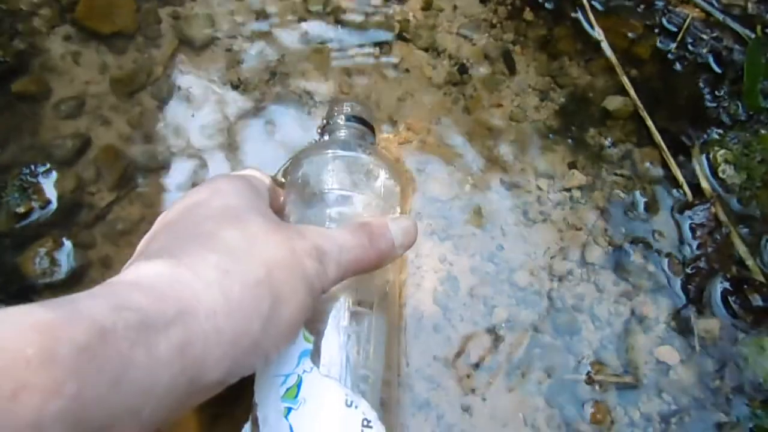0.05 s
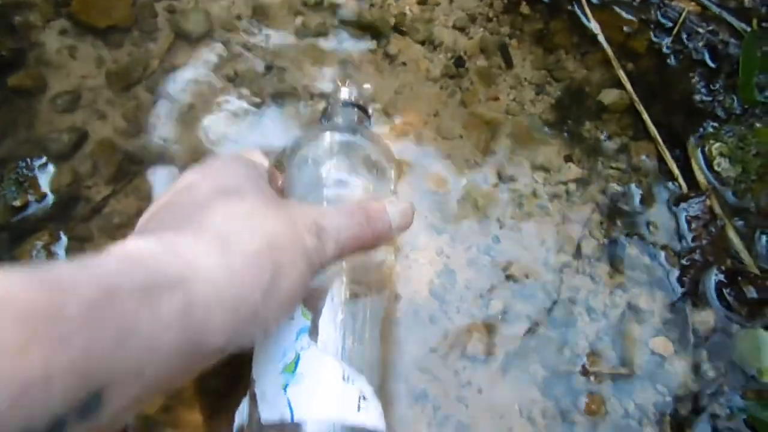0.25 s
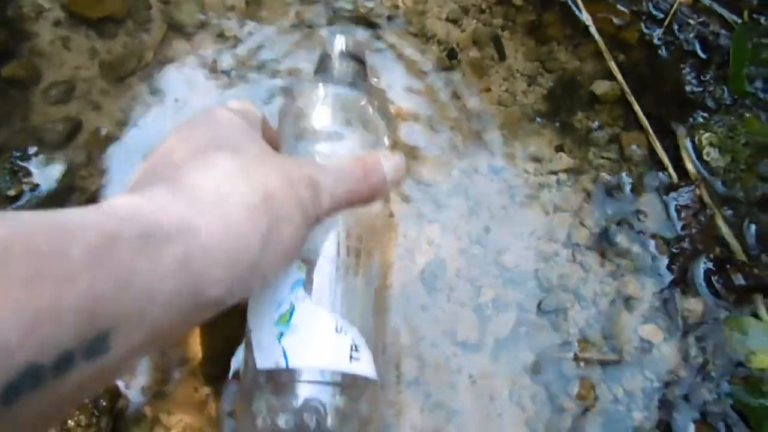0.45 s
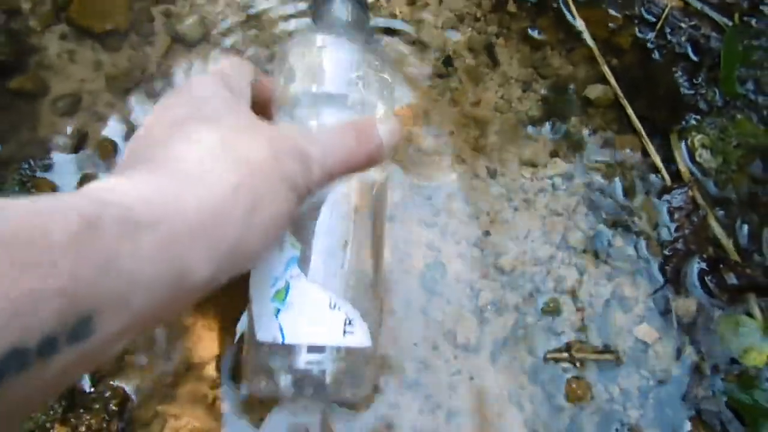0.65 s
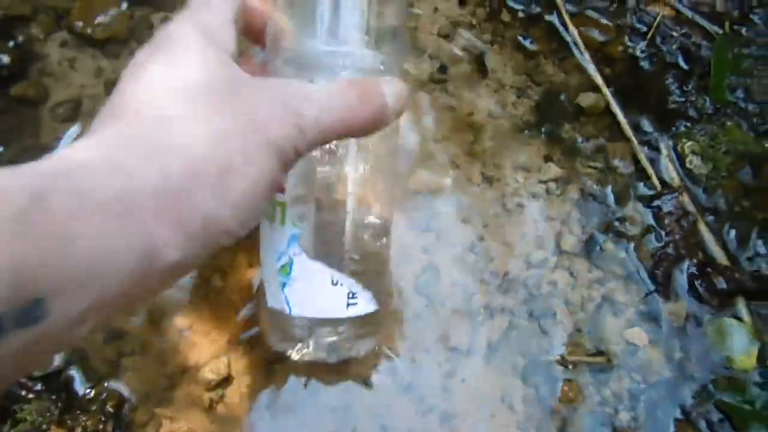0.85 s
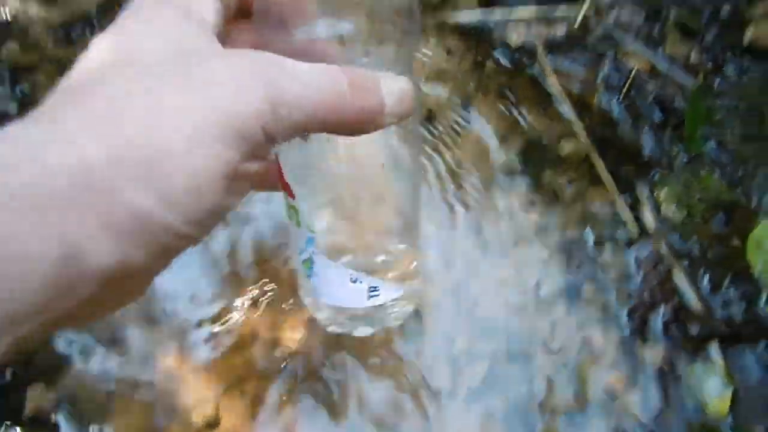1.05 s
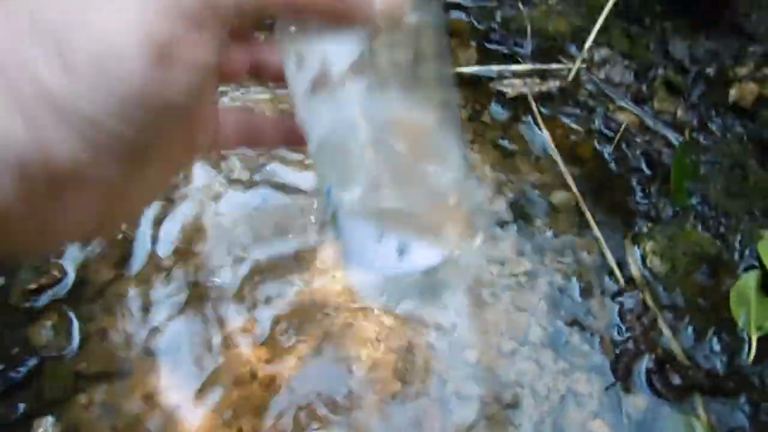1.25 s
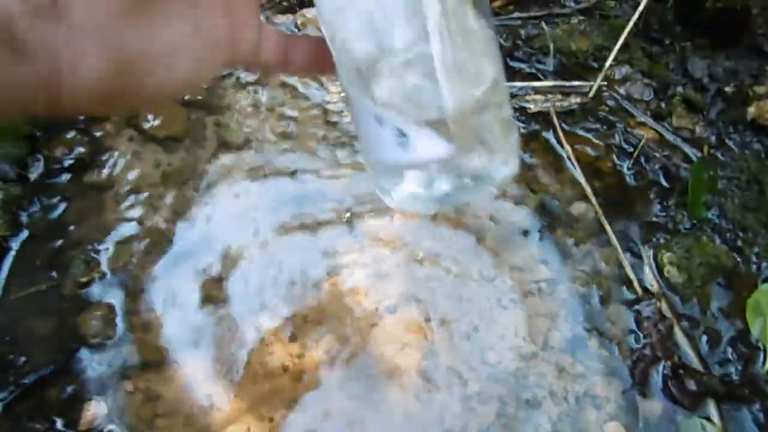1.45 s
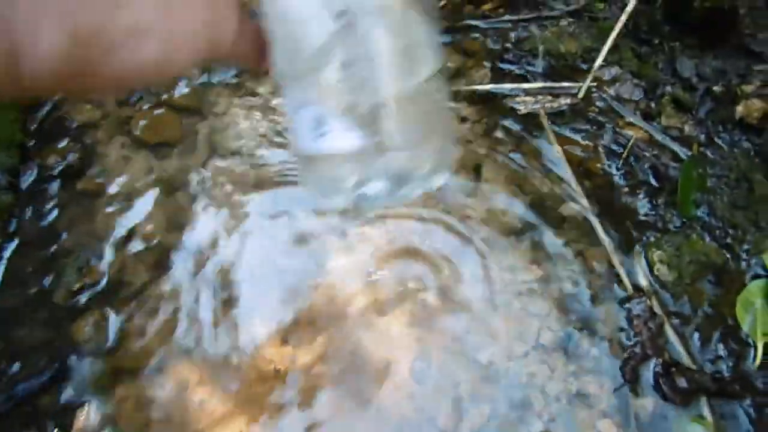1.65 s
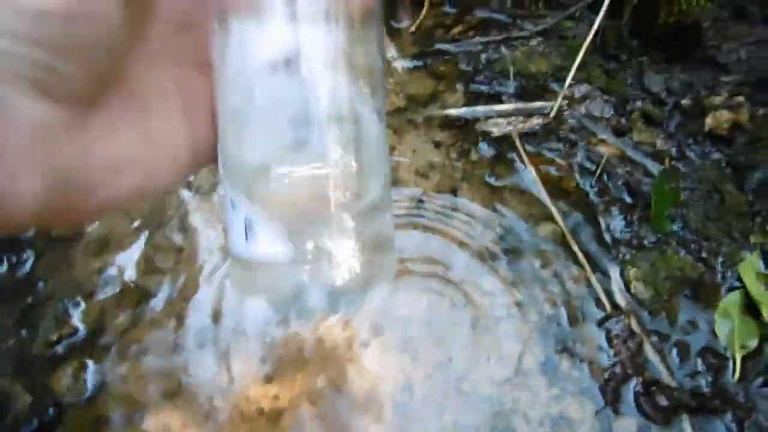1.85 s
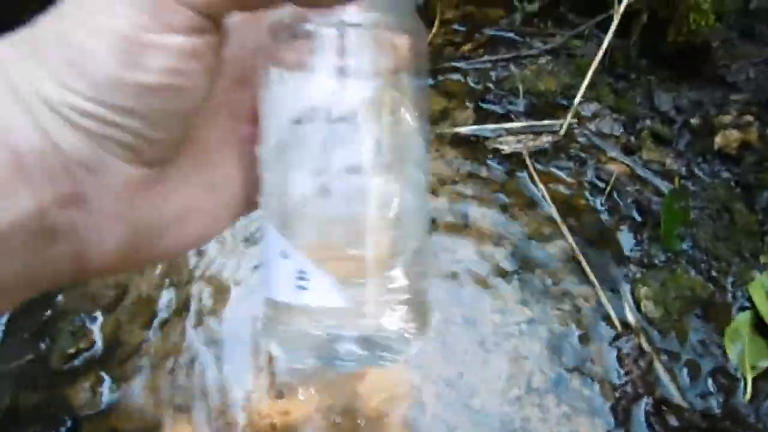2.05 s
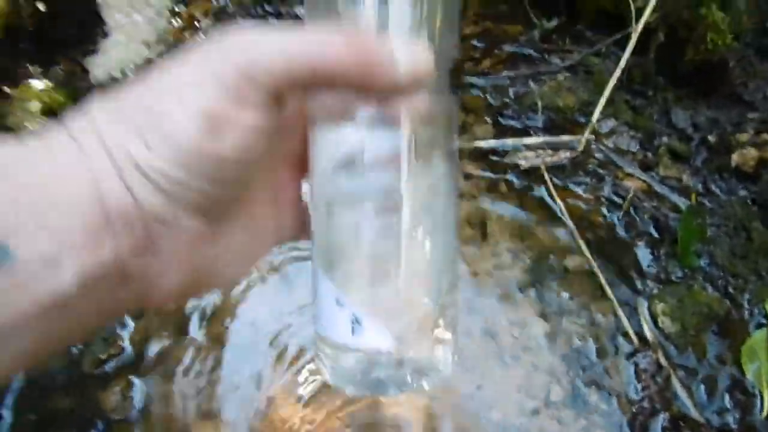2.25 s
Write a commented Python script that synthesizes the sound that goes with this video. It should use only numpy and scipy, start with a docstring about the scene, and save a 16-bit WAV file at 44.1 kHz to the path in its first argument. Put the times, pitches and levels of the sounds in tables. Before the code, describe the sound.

Short wet splashes and bubbles burst around a thin plastic bottle that crackles and rings hollow, then stop; two tiny drips, a light plastic knock and high bird notes follow over faint stream hiss, close microphone outdoors.

```python
"""Plastic bottle in a woodland stream

Water splashes at the bottle in short spurts: filtered droplet clicks and noise, with bubbles as dying sines.
The thin wall crackles as damped modes and noise, the hollow resonates, and two drops and a knock follow.
Behind the filtered-noise hiss of the stream, a small bird's frequency-modulated notes echo among the trees."""
import sys
import numpy as np
from scipy import signal
from scipy.fft import rfft, irfft, next_fast_len
from scipy.io import wavfile
from scipy.ndimage import uniform_filter1d

SR = 44100
rng = np.random.default_rng(int(sys.argv[2]) if len(sys.argv) > 2 else 0)


def log_audio(samples):
    """Write samples as a 16-bit WAV file to the path given in sys.argv[1]."""
    # one column per channel
    frames = np.atleast_2d(samples).T
    # limit to full scale, then quantise
    limited = np.clip(frames, -1, 1)
    pcm = np.round(limited * 32767).astype(np.int16)
    wavfile.write(sys.argv[1], SR, pcm)


N = 99225  # samples in the scene


def amp(db):
    """Logarithmic level: decibels to amplitude gain."""
    return 10 ** (np.asarray(db) / 20)


def evened(x):
    """Normalisation to an rms of 1."""
    return x / np.sqrt(np.mean(x ** 2) + 1e-20)


def add(mix, start_s, sound):
    """Linear superposition: a sound is summed into the mix at its start."""
    part = mix[max(round(start_s * SR), 0):][:len(sound)]
    part += sound[:len(part)]


def read(points, hz):
    """Interpolation of a spectrum on a log-frequency axis, at -120 dB above its last point."""
    point_hz, point_db = np.transpose(points)
    return np.interp(np.log(hz + 1), np.log(point_hz + 1), point_db, right=-120)


def colour(x, db_at):
    """Spectral filtering: each frequency is scaled by a function from Hz to dB."""
    size = next_fast_len(len(x))
    gain = amp(db_at(np.fft.rfftfreq(size, 1 / SR)))
    return irfft(rfft(x, size) * gain, size)[:len(x)]


def dying(t, t60_s):
    """Exponential decay: the level falls 60 dB in t60."""
    return np.exp(-np.log(1000) * t / t60_s)


def patter(size, rate_per_s, spread_db):
    """Random impulse process: clicks of either sign and uneven strength at a mean rate."""
    chance, strength, sign = rng.random((3, size))
    strength_db = spread_db * np.minimum(-np.log(1 - strength), np.pi)
    return (chance < rate_per_s / SR) * np.sign(sign - .5) * amp(strength_db)


def echo(x, t60_s):
    """Diffuse reverberation: convolution with a decaying noise tail of energy 1."""
    t = np.arange(SR // 2) / SR
    build_up = np.minimum(t / .008, 1)
    tail = rng.standard_normal(len(t)) * dying(t, t60_s) * build_up
    return signal.fftconvolve(x, tail / np.linalg.norm(tail))[:N]


def pings(rows, climb_per_s):
    """Damped oscillation: dying sines whose pitch climbs by a share of itself each second."""
    out, t = np.zeros(N), np.arange(SR // 8) / SR
    for start_s, pitch_hz, level_db, t60_s in rows:
        cycles = pitch_hz * (t + climb_per_s / 2 * t ** 2)
        onset = 1 - np.exp(-t * pitch_hz)
        add(out, start_s, amp(level_db) * dying(t, t60_s) * onset * np.sin(2 * np.pi * cycles))
    return out


# Relative spectrum of the stream's hiss and rumble: frequency_hz, density_db (per Hz)
STREAM_SPECTRUM = [(12, -11.5), (25, 0.5), (45, -2), (80, -3), (150, -5.5), (220, -8.5), (330, -10.5),
                   (750, -10.5), (1300, -11.5), (2000, -13.5), (4500, -14), (8600, -15.5)]
STREAM_DB, RIPPLE_RMS_DB = -58, .5
TICKS_PER_S, TICKS_RMS_DB, TICK_SPREAD_DB = 82, -73, 5.5


def stream():
    """Filtered noise: a gently rippling hiss and rumble, with sparse impulses as ticks of trickling water."""
    hiss = evened(colour(rng.standard_normal(N), lambda f: read(STREAM_SPECTRUM, f)))
    # noise falling 1 dB per Hz leaves a slow wander of level
    ripple = evened(colour(rng.standard_normal(N), lambda f: -np.minimum(f, 200)))
    clicks = patter(N, TICKS_PER_S, TICK_SPREAD_DB)
    ticks = evened(colour(clicks, lambda f: read(SPRAY_SPECTRUM, f)))
    return amp(STREAM_DB) * hiss * amp(RIPPLE_RMS_DB * ripple) + amp(TICKS_RMS_DB) * ticks


# Spurts of water: start_s, length_s, level_db, bass_db, treble_db
SPURTS = [(0.116, 0.022, -52.5, -8, -0.5), (.137, 0.025, -50, -4, 5.5), (0.165, 0.041, -51.5, 1, 0.5),
          (0.223, 0.039, -53.5, 2, -4.5), (.262, 0.018, -46, 4.5, 0), (0.278, 0.025, -44, -0.5, 4),
          (0.31, 0.015, -46.5, -3.5, 3), (0.326, .012, -40, 1, -2), (0.34, 0.0093, -49.5, 7, -4),
          (0.362, 0.013, -49.5, 1.5, -4), (.385, .025, -58, -3, 2), (0.413, 0.009, -48.5, -19, 1.5),
          (0.433, 0.01, -48, -12, -9), (0.443, 0.022, -45, 2, 2), (0.481, .013, -45.5, -4, -9),
          (.496, 0.0093, -37.5, -10, 4), (.505, .009, -43, -2, -1), (.515, .028, -49, 3, 0.5),
          (0.542, 0.0073, -41, -5, 7), (0.558, 0.0092, -40.5, 4, 9.5), (0.571, 0.0055, -40, 3, 7),
          (.579, .01, -42.5, 0, -5), (.589, .018, -40.5, 1, -1.5), (.608, 0.025, -44.5, 4, -2),
          (0.631, 0.016, -41.5, 1, -3), (.65, 0.016, -52.5, 4, -2), (0.666, .007, -42.5, -8, 2),
          (0.682, 0.0073, -44.5, -16, 3.5), (.691, 0.011, -52.5, -2, -1), (.719, .0047, -45.5, -8, 6),
          (.747, 0.017, -49.5, -3, -5), (.767, 0.03, -53.5, -21, 2), (0.797, 0.011, -41, -2.5, 3),
          (0.808, .014, -48.5, 5, -2), (1.066, 0.02, -54.5, -5, 10), (1.955, .04, -58.7, -5, -5)]
# Relative spectrum of spray, also used for ticks and cracks: frequency_hz, density_db (per Hz)
SPRAY_SPECTRUM = [(120, -17.5), (250, -9.5), (330, -11.5), (500, -0.5), (760, -0.5), (1200, -1),
                  (1600, -0.5), (2000, 0), (2400, 4), (2900, 1), (3400, -0.5), (4000, 2), (5000, 0),
                  (5600, -3), (7400, -3.5), (8300, -7.5)]
DROPS_PER_S, DROP_SPREAD_DB = 3500, 2.5
MIST = .36  # rms beside droplets of rms 1
SPLASH_RISE_S, SPLASH_FALL_S = .0014, .0043  # linear rise; time constant of the fall
BASS_HZ, TREBLE_HZ = 1190, 5160


def splashes():
    """Shot noise: each spurt is a dense patter of droplet impulses with a little fine mist."""
    out, t = np.zeros(N), np.arange(4096) / SR
    for start_s, length_s, level_db, bass_db, treble_db in SPURTS:
        def spray_db(f):
            bass = bass_db / (1 + (f / BASS_HZ) ** 4)
            treble = treble_db * (1 - 1 / (1 + (f / TREBLE_HZ) ** 8))
            return read(SPRAY_SPECTRUM, f) + bass + treble

        drops = evened(patter(len(t), DROPS_PER_S, DROP_SPREAD_DB))
        spray = colour(drops + MIST * rng.standard_normal(len(t)), spray_db)
        fall = np.exp(-np.maximum(t - length_s, 0) / SPLASH_FALL_S)
        shape = np.minimum(t / SPLASH_RISE_S, 1) * fall
        add(out, start_s, amp(level_db) * evened(spray * shape) * np.sqrt(np.mean(shape ** 2)))
    return out


# Resonances of the bottle's hollow: frequency_hz, gain_db, t60_s
HOLLOW_MODES = [(241, 0, 0.11), (548, -5, 0.088), (1005, -7, 0.15), (1410, -8, 0.054), (1905, -2.5, 0.063),
                (2013, -2.5, 0.12), (2600, -4.5, 0.058), (3235, -7, .05), (3625, -5, 0.051),
                (4276, -7, 0.06)]
STRAIGHT_DB = -1  # the sound that bypasses the resonances


def hollow(x):
    """Cavity resonance: the bottle's narrow modes ring on after whatever strikes it."""
    t = np.arange(SR // 5) / SR
    ring = np.zeros(len(t))
    for mode_hz, gain_db, t60_s in HOLLOW_MODES:
        peak_scale = 2 * np.log(1000) / (t60_s * SR)  # evens the resonant gain across decay times
        ring += amp(gain_db) * peak_scale * dying(t, t60_s) * np.cos(2 * np.pi * mode_hz * t)
    return amp(STRAIGHT_DB) * x + signal.fftconvolve(x, ring)[:N]


BUBBLES_PER_S, BUBBLE_DB, BUBBLE_SPREAD_DB = 240, -2, 1.5  # level relative to the spurt, plus or minus spread
BUBBLE_LOW_HZ, BUBBLE_HIGH_HZ = 1300, 4800
BUBBLE_CYCLES, BUBBLE_CLIMB_PER_S = 60, 2  # cycles in one t60, before the climb


def fizz():
    """Bubble resonance: every spurt may trap tiny bubbles; the smaller ones ring higher and die sooner."""
    rows = []
    for start_s, length_s, level_db, _, _ in SPURTS:
        for chance, when, height, strength in rng.random((16, 4)):
            if chance < BUBBLES_PER_S * length_s / 16:
                pitch_hz = BUBBLE_LOW_HZ + (BUBBLE_HIGH_HZ - BUBBLE_LOW_HZ) * height
                bubble_db = level_db + BUBBLE_DB + BUBBLE_SPREAD_DB * (2 * strength - 1)
                rows.append((start_s + when * length_s, pitch_hz, bubble_db, BUBBLE_CYCLES / pitch_hz))
    return pings(rows, BUBBLE_CLIMB_PER_S)


# Single bubbles heard in the splashes, in order of time: start_s, pitch_hz, level_db
SINGLE_BUBBLES = [(.139, 2530, -47), (.237, 690, -53), (.270, 1060, -46), (.287, 785, -50),
                  (.332, 3810, -40), (.332, 860, -48), (.339, 581, -47), (.367, 1000, -53),
                  (.444, 2140, -42), (.446, 585, -47), (.452, 3905, -44), (.495, 2550, -38),
                  (.497, 3240, -39), (.499, 4195, -36), (.499, 1280, -42), (.508, 995, -44),
                  (.542, 4595, -43), (.558, 500, -45), (.570, 590, -43), (.585, 505, -44),
                  (.591, 3980, -37.5), (.596, 1915, -41), (.616, 450, -45), (.620, 3615, -35.5),
                  (.621, 945, -45), (.688, 239, -52.5), (.750, 1410, -51), (.801, 880, -48),
                  (.808, 640, -51), (.816, 1245, -50), (.818, 249, -54.5)]
GURGLE_T60_S, GURGLE_REF_HZ, GURGLE_DAMPING = .08, 1000, .35  # t60 at the reference pitch; exponent
DROP_CLIMB_PER_S = .7  # shared by gurgles and drips


def gurgles():
    """Bubble resonance: each bubble climbs a little in pitch, and higher ones die sooner."""
    rows = []
    for start_s, pitch_hz, level_db in SINGLE_BUBBLES:
        t60_s = GURGLE_T60_S * (GURGLE_REF_HZ / pitch_hz) ** GURGLE_DAMPING
        rows.append((start_s, pitch_hz, level_db, t60_s))
    return pings(rows, DROP_CLIMB_PER_S)


# Buckling of the wall: start_s, crack_db, ring_db, pitch_hz (main mode)
BUCKLES = [(.1925, -41, -49, 1880), (.2855, -36, -41, 2350), (.3413, -26.5, -33.5, 2420),
           (.3708, -40, -51, 2200), (.4156, -45, -47, 2050), (.4872, -50, -34, 2050),
           (.4922, -37, -28, 1990), (.5005, -35.5, -35, 2280), (.511, -36, -34, 1920),
           (.5462, -39.5, -32, 2130), (.5545, -56, -36.5, 2030), (.5617, -33, -27.5, 2020),
           (.6212, -27, -24, 1990), (.6722, -44, -32, 1880), (.6845, -44, -35, 1830)]
# Modes of the wall: multiple (of the main mode), level_db, t60_s
WALL_MODES = [(.49, -18, .0077), (1, -1, .021), (1.17, -12, .011), (1.85, -7, .017)]
CRACK_T60_S, SNAP_RISE_S = .018, .00049


def snaps():
    """Snap-through buckling: a short crack and damped modes, pitched by how tightly the wall is bent."""
    out, t = np.zeros(N), np.arange(2048) / SR
    for start_s, crack_db, ring_db, pitch_hz in BUCKLES:
        ring = np.zeros(len(t))
        for multiple, level_db, t60_s in WALL_MODES:
            ring += amp(level_db) * dying(t, t60_s) * np.sin(2 * np.pi * pitch_hz * multiple * t)
        noise = evened(colour(rng.standard_normal(len(t)), lambda f: read(SPRAY_SPECTRUM, f)))
        crack = noise * dying(t, CRACK_T60_S)
        rise = np.minimum(t / SNAP_RISE_S, 1)
        add(out, start_s, rise * (amp(ring_db) * ring + amp(crack_db) * crack))
    return out


# Dull bumps of the water and hand: start_s, pitch_hz, level_db, t60_s
DULL_BUMPS = [(.29, 118, -39.5, .09), (.289, 270, -42, .025), (2.085, 30, -44, 0.085)]


def bumps():
    """Damped low-frequency oscillation: dull bumps of steady pitch."""
    return pings(DULL_BUMPS, 0)


# Drops falling back into the stream: start_s, pitch_hz, level_db, t60_s
FALLING_DROPS = [(.9775, 3900, -43.5, .017), (1.2128, 7250, -44.5, .018)]


def drips():
    """Damped oscillation: each drop rings briefly with a slightly climbing pitch."""
    return pings(FALLING_DROPS, DROP_CLIMB_PER_S)


# Single bird notes: start_s, length_s, first_hz, last_hz, level_db, trill_depth_hz
BIRD_NOTES = [(.985, 0.06, 7750, 7200, -61.5, 246), (1.084, 0.0436, 6000, 6250, -57, 230),
              (1.15, 0.04, 6200, 5600, -62, 150), (1.478, .03, 5080, 5080, -58, 170),
              (1.505, .045, 4800, 4250, -61.5, 302), (1.593, 0.04, 6160, 6310, -59, 100),
              (1.63, 0.036, 6330, 6346, -54, 50), (1.662, 0.03, 5800, 5740, -59.5, 30)]
# Phrase sung twice: start_s (from the phrase's own start), length_s, first_hz, last_hz, level_db, trill_depth_hz
BIRD_PHRASE = [(0, .052, 7820, 7300, -59, 230), (.06, .022, 6050, 5970, -53.5, 60),
               (.07, .055, 5850, 5100, -58.5, 300), (.079, .055, 4510, 4820, -56.5, 190)]
# Starts of the phrase: start_s
PHRASE_TIMES = [1.878, 2.087]
TRILL_HZ, TRILL_UNEVEN, NOTE_EDGE_S = 111.6, .26, .0048  # mean rate, its rms share of wander, fade length
BIRD_DIRECT_DB, WOODS_DB, WOODS_T60_S = -5, -1.2, .45


def bird():
    """Frequency modulation: thin gliding notes with a fast trill, smeared by reflections from the trees."""
    song = np.zeros(N)
    repeats = [(begin_s + start_s, *note) for begin_s in PHRASE_TIMES for start_s, *note in BIRD_PHRASE]
    for start_s, length_s, first_hz, last_hz, level_db, depth_hz in BIRD_NOTES + repeats:
        t = np.arange(0, length_s, 1 / SR)
        wander = evened(uniform_filter1d(rng.standard_normal(SR // 8), size=200))[:len(t)]
        trill_hz = TRILL_HZ * (1 + TRILL_UNEVEN * wander)
        trill = np.sin(2 * np.pi * np.cumsum(trill_hz) / SR)
        pitch_hz = first_hz + (last_hz - first_hz) * t / length_s + depth_hz * trill
        shape = np.clip(np.minimum(t, length_s - t) / NOTE_EDGE_S, 0, 1)
        tone = np.sqrt(2) * np.sin(2 * np.pi * np.cumsum(pitch_hz) / SR)
        add(song, start_s, amp(level_db) * shape * tone)
    return amp(BIRD_DIRECT_DB) * song + amp(WOODS_DB) * echo(song, WOODS_T60_S)


# Slips of the bottle in the fingers: start_s, level_db
SLIPS = [(1.8995, -47.5), (1.9045, -45.5), (1.9095, -46.5)]
# Modes of the knocked bottle: pitch_hz, level_db (relative to the slip)
KNOCKED_MODES = [(1950, -2), (2270, -1), (2760, -2), (3410, -2), (4200, -4)]
KNOCK_T60_S, KNOCK_DETUNE = .018, .04  # rms share of random detuning of each mode


def knocks():
    """Modal excitation: each slip rings the same few modes of the knocked bottle, a little detuned."""
    rows = []
    for start_s, level_db in SLIPS:
        for mode_hz, mode_db in KNOCKED_MODES:
            pitch_hz = mode_hz * (1 + KNOCK_DETUNE * rng.standard_normal())
            rows.append((start_s, pitch_hz, level_db + mode_db, KNOCK_T60_S))
    return pings(rows, 0)


BANK_DB, BANK_T60_S = -12.5, .11


def scene():
    """Superposition of the near bottle and water, the bank's short echo, the stream and the bird."""
    bottle = hollow(splashes() + snaps())
    near = bottle + fizz() + gurgles() + knocks() + drips() + bumps()
    return (near + amp(BANK_DB) * echo(near, BANK_T60_S) + stream() + bird())[None]


SOFT_EDGE_HZ, SOFT_EDGE_DB_PER_HZ, EDGE_HZ = 7394, .027, 8620


def record(dry):
    """Low-pass filtering: the microphone's top end rolls off, then stops steeply."""
    soft = colour(dry[0], lambda f: -SOFT_EDGE_DB_PER_HZ * np.maximum(f - SOFT_EDGE_HZ, 0))
    steep = signal.firwin(611, EDGE_HZ, window=("kaiser", 9), fs=SR)
    return signal.oaconvolve(soft, steep, "same")[None]


dry = scene()
out = record(dry)
log_audio(out)
```